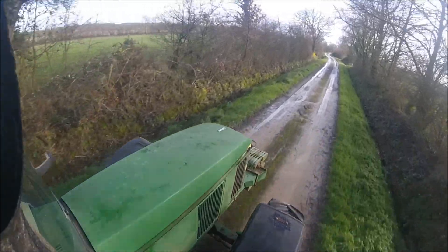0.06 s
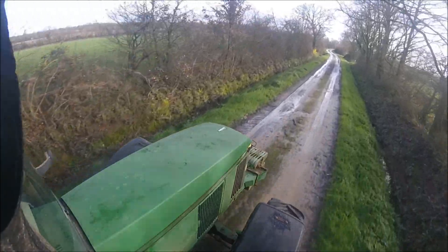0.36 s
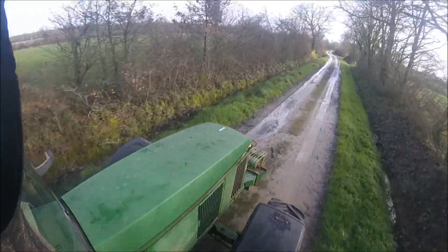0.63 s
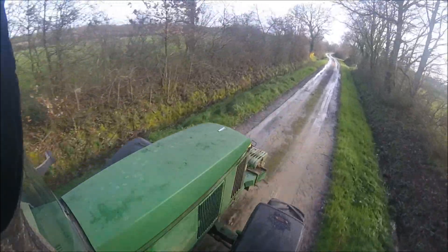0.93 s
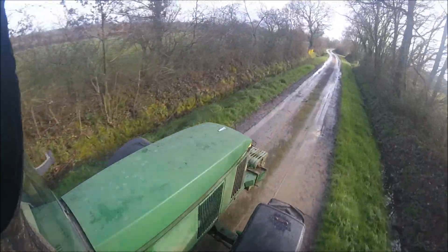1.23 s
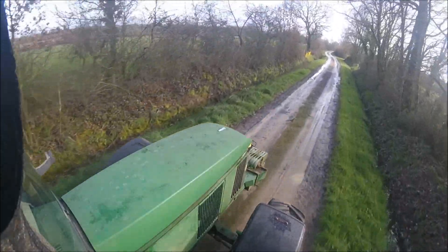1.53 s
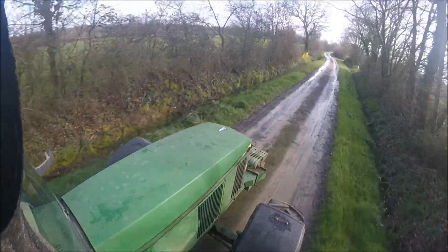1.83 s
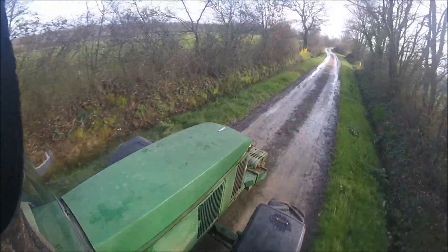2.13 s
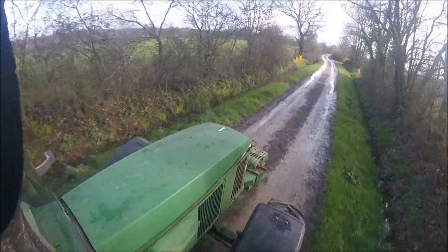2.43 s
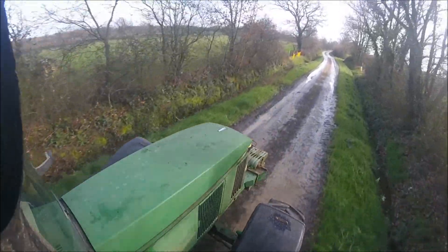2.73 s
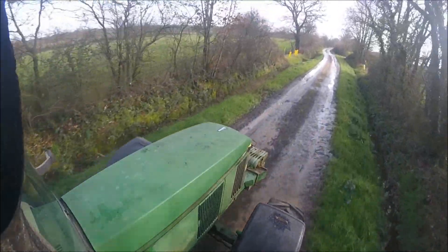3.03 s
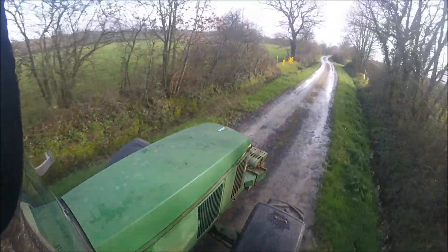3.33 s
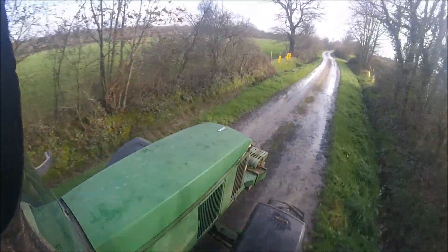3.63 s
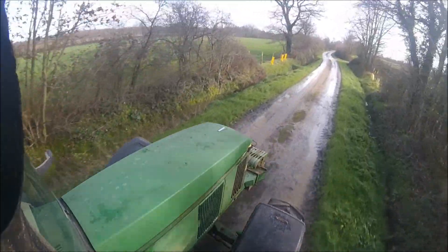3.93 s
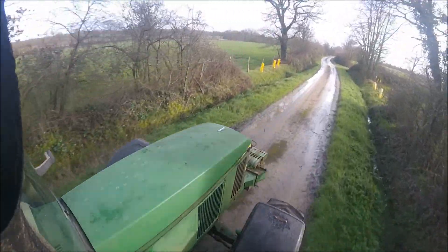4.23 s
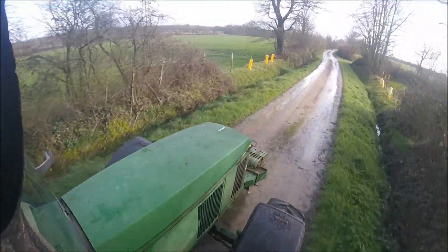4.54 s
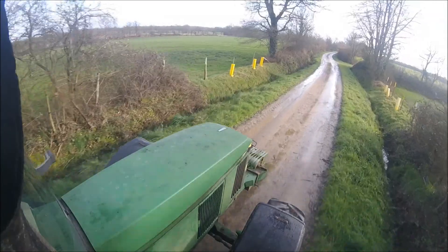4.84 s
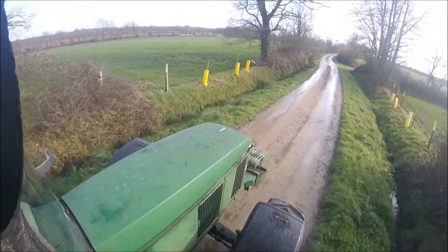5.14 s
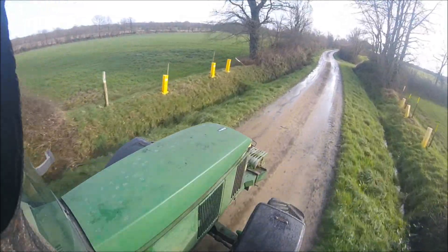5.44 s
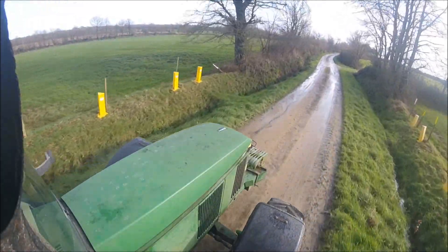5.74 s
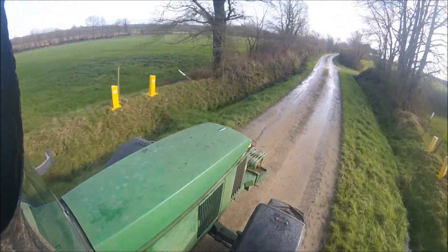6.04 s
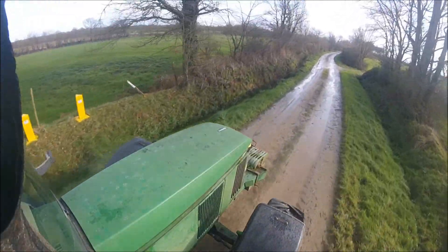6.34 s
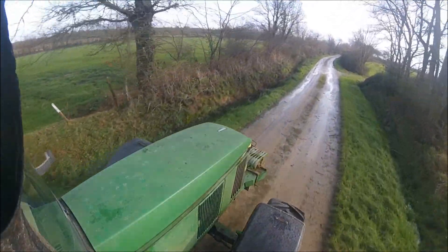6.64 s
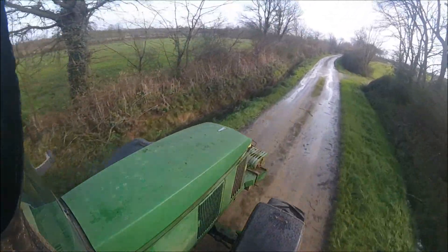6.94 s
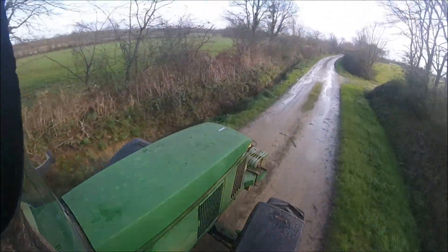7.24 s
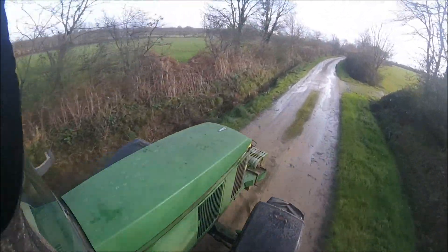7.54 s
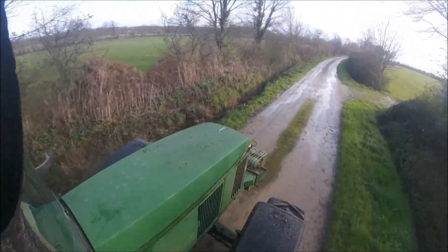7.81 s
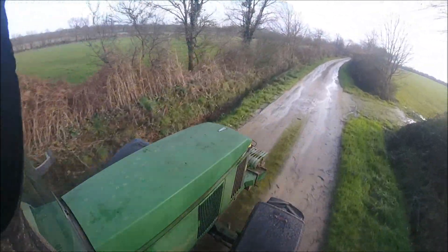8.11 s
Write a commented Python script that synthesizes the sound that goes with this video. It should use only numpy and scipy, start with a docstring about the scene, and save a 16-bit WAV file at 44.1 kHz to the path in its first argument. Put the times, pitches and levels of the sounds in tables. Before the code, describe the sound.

Inside a tractor cab, a mounted microphone picks up the deep drone and hard knock of the diesel engine, wavering slightly and creeping up in pitch over rumbling tyres and buzzing panels. Grit ticks and loose fittings knock now and then. Past halfway the farm track turns rough, with rattles, hollow roof thumps and a sharp jolt that muffles the level for a second. Further knocks and thumps follow.

```python
"""Inside the cab of a six-cylinder diesel tractor, microphone on a mounted camera, engine close by.
From the start each firing booms in the cab, shakes its panels and clatters in the block, while grit
ticks and loose fittings knock. The tractor slowly gathers speed along a farm track, the engine hunting
most around 3 s. A metal part chinks; from 5 s rough ground sets the fittings rattling and the roof
drumming. Near 6 s a pothole jolts the camera so hard that its limiter ducks everything for about
a second. More bumps follow near 8 s."""
import sys
import numpy as np
from scipy import signal
from scipy.fft import rfft, irfft
from scipy.io import wavfile
from scipy.ndimage import uniform_filter1d, minimum_filter1d

SR = 44100
rng = np.random.default_rng(int(sys.argv[2]) if len(sys.argv) > 2 else 0)


def unload_audio(sound):
    """Save the sound as a 16-bit wav file, at the path given as the first command line argument."""
    columns = np.transpose(np.atleast_2d(sound))
    # keep every value between -1 and 1, then stretch to whole-number steps
    steps = np.round(np.clip(columns, -1, 1) * 32767)
    wavfile.write(sys.argv[1], SR, steps.astype(np.int16))


N = 364707
TIME = np.arange(N) / SR

# The cylinders in firing order. Each row: combustion knock in dB, injector tick in dB, both relative.
CYLINDER_DB = [(5, 2.5), (5, 3.5), (2.5, 2), (5.5, 2.5), (5.5, 0.5), (2.5, 3)]
# Resonance of the cab roof. Each row: frequency in Hz, relative level in dB.
ROOF_SPECTRUM = [(60, -26.5), (130, -4), (200, 1.5), (310, 1), (400, -4), (600, -13.5), (1200, -44),
                 (4000, -78), (13000, -115)]


def amp(db):
    """Decibels to gain."""
    return 10 ** (np.asarray(db) / 20)


def unit(x):
    """Scales to rms 1."""
    return x / np.sqrt(np.mean(x ** 2) + 1e-20)


def curve(at, rows):
    """Reads between the rows of a two-column table along straight lines."""
    return np.interp(at, *np.transpose(rows))


def wander(rate_hz):
    """Slow random drift of rms 1."""
    hz = np.fft.rfftfreq(N, 1 / SR)
    return unit(irfft(rfft(rng.standard_normal(N)) / (1 + (hz / rate_hz) ** 4), N))


def colour(x, spectrum, size=4096):
    """Rings x through a causal body with the given spectrum; a unit click comes out with peak 1."""
    hz, db = np.transpose(spectrum)
    bin_hz = abs(np.fft.fftfreq(size, 1 / SR)) + 1
    log_gain = np.log(amp(np.interp(np.log(bin_hz), np.log(hz), db)))
    minimum_phase = np.exp(np.conj(signal.hilbert(log_gain)))
    ring = np.fft.ifft(minimum_phase).real[:size // 2]
    return signal.oaconvolve(x, ring / abs(ring).max())[:N]


def burst(firings, at, width):
    """A bump once a firing; its centre and width are shares of that cycle."""
    return np.exp(-(np.sin(np.pi * (firings - at)) / (np.pi * width)) ** 2)


def strength(firings, scatter_db, pattern_db=(0,)):
    """Gain of each firing: its cylinder's share and some chance."""
    index = np.floor(firings + .6).astype(int)
    chance = rng.standard_normal(index.max() + 1)
    return amp(np.take(pattern_db, index, mode="wrap") + scatter_db * chance[index])


def roughness(edge_s=0.041):
    """How rough the track is as the wheels run on to and off each stretch, 0 where it is smooth."""
    # Each row: start in seconds, end in seconds, roughness from 0 to 1.
    stretches = [(0.206, 0.852, 0.1), (5.034, 5.25, 0.5), (5.257, 5.604, 0.6), (5.596, 5.69, .95),
                 (5.715, 6.188, 0.8), (6.714, 6.996, 0), (7.743, 8.396, 0.6)]
    return sum(rough * (np.tanh((TIME - start) / edge_s) - np.tanh((TIME - end) / edge_s)) / 2
               for start, end, rough in stretches)


def rolling(shake_db, faster_hz, level_db=-22, lumps_db=2.0):
    """Lugged tyres rumble on the track, more where it is rough and as the tractor speeds up."""
    # Tyre rumble. Each row: frequency in Hz, relative level in dB.
    spectrum = [(10, -18.5), (28, -6), (55, 0.5), (130, 3), (220, -1), (400, -8), (900, -18), (2500, -31.5),
                (8000, -65.5), (13000, -110)]
    swell = amp(shake_db - shake_db.mean() + 0.23 * faster_hz + lumps_db * wander(17))
    return amp(level_db) * unit(colour(rng.standard_normal(N), spectrum) * swell)


def grit(gain_db=-8.5, stray_per_s=4, skitter_s=0.0021, touches=3):
    """Grit flung by the tyres skitters against the cab: a few sharp hits among many faint ones."""
    # The sharpest hits. Each row: time in seconds, relative level in dB.
    hits = [(.828, -23), (1.181, -44), (1.351, -26), (1.56, -33), (3.387, -28), (3.803, -29), (4.18, -28),
            (4.488, -26), (6.736, -31.5), (7.98, -27), (8.201, -30)]
    # Their bright tick. Each row: frequency in Hz, relative level in dB.
    spectrum = [(500, -28.5), (2500, -13.5), (5000, 1.5), (7500, 2.5), (9000, -9.5), (11000, -28),
                (14000, -59.5)]
    stray_times = TIME[rng.random(N) < stray_per_s / SR]
    strays = [(s, -32 + 6 * rng.standard_normal()) for s in stray_times]
    clicks = np.zeros(N + SR)
    for s, db in hits + strays:
        touch_s = s + skitter_s * (rng.random(touches) - .5)
        clicks[(touch_s * SR).astype(int)] += amp(db) * rng.choice([-1, 1], touches)
    return amp(gain_db) * colour(clicks, spectrum)


def chinks(attack_s=0.00055):
    """A loose metal part is shaken against its seat and rings for a moment."""
    # Each row: time in seconds, peak in dB.
    strikes = [(4.3817, -27), (4.5204, -27), (4.5772, -27.5), (4.6471, -31)]
    # The part's modes. Each row: frequency in Hz, relative level in dB, seconds to fall 60 dB.
    modes = [(2900, 0, .02), (3410, -5, 0.031), (3680, 4, 0.021)]
    t = np.arange(0, .1, 1 / SR)
    ring = sum(amp(db - 60 * t / t60) * np.sin(2 * np.pi * hz * t) for hz, db, t60 in modes)
    ring *= 1 - np.exp(-(t / attack_s) ** 2)
    clicks = np.zeros(N)
    for s, db in strikes:
        clicks[int(s * SR)] = amp(db)
    return signal.oaconvolve(clicks, ring / abs(ring).max())[:N]


def roof_drumming(firings, shake_db, level_db=-28, growth=2.6):
    """On rough ground the roof starts to drum, growing faster than the shaking that drives it."""
    drive = rng.standard_normal(N) * (0.69 + burst(firings, at=0, width=0.13))
    swell = amp(growth * (shake_db - shake_db.mean()))
    return amp(level_db) * unit(colour(drive * swell, ROOF_SPECTRUM))


def roof_thumps():
    """The hardest bumps each give the roof overhead one hollow thump."""
    # Each row: time in seconds, peak in dB.
    bumps = [(5.248, -11), (5.456, -6), (5.623, -10), (5.647, -3), (5.665, -6), (5.69, -7), (8.04, -12),
             (8.06, -4.5)]
    blows = np.zeros(N)
    for s, db in bumps:
        blows[int(s * SR)] = -amp(db)
    return colour(blows, ROOF_SPECTRUM)


def rattles(rough, min_bounce_s=.0007, bounce=0.14, rough_per_s=20):
    """A cab fitting clacks, rings hollow and springs back; rough ground adds small knocks by chance."""
    # The loudest knocks. Each row: time in seconds, hollow peak in dB, clack in dB against that peak.
    loud_knocks = [(.597, -12, -8), (2.925, -14, -5), (3.114, -15.5, -3), (5.052, -11.5, -5),
                   (5.111, -13, -16), (5.153, -10, -16), (5.232, -18, -6), (5.247, -11, -2),
                   (5.293, -7, -6), (5.302, -10, -6), (5.312, -9, -9), (5.345, -10, -3), (5.387, -6, -16),
                   (5.578, -8, -10), (6.817, -8, -8), (6.985, -12.5, -3), (7.945, -18, -4),
                   (7.998, -6.5, -7), (8.247, -11, -11)]
    # The hollow ring and the hard clack. Each row: frequency in Hz, relative level in dB.
    hollow_spectrum = [(80, -11), (250, 2), (500, 12.5), (1000, -5), (1700, -9), (3000, -29.5), (4200, -27),
                       (5200, -21.5), (8000, -48), (11000, -75), (14000, -88.5)]
    clack_spectrum = [(300, -17.5), (650, -2.5), (950, -1.5), (1350, -13.5), (1900, -11.5), (3000, -22),
                      (5000, -30), (8000, -48.5), (10500, -78.5), (13000, -98)]
    small_times = TIME[rng.random(N) < rough_per_s * rough / SR]
    knocks = loud_knocks + [(s, -19 + 5 * rng.standard_normal(), -6) for s in small_times]
    hollow, clack = np.zeros((2, N + SR))
    for s, db, clack_db in knocks:
        bounce_at = s + min_bounce_s * (1 + rng.random())
        hollow[int(s * SR)] -= amp(db)
        hollow[int(bounce_at * SR)] += bounce * amp(db)
        clack[int(s * SR)] -= amp(db + clack_db)
    return colour(hollow, hollow_spectrum) + colour(clack, clack_spectrum)


def pothole(rise_s=.0004, lag_s=0.00074, sway_s=.008, crack_s=.00004, dull_hz=5500):
    """The camera mount snaps inward with a thin crack, pushes back dully and sways as it settles."""
    # Bangs right at the microphone. Each row: time in seconds, peak in dB before dulling,
    # snap width in seconds, relative weight of the rebound, decay of its push in seconds.
    bangs = [(5.8554, 8, .00027, 2.1, 0.0014), (5.9113, 6.5, 0.00027, 0.34, 0.0016),
             (5.9976, 5.5, 0.00031, 0.37, 0.0028), (6.0634, 0, .0003, 4, 0.0015),
             (6.1057, -3.5, .00028, 2.7, 0.00045)]
    out = np.zeros(N)
    for s, db, snap_s, rebound, push_s in bangs:
        t = TIME - s
        snap = np.exp(-((t - lag_s / 2) / snap_s) ** 2)
        crack = 0.16 * np.exp(-((t - lag_s / 2) / crack_s) ** 2)
        after = np.maximum(t - lag_s, 0)
        push = (1 - np.exp(-after / rise_s)) * np.exp(-after / push_s)
        sway = .075 * after / sway_s * np.exp(1 - after / sway_s)
        bang = 2 * rebound * (push - sway) - snap - crack
        out += amp(db) * bang / abs(bang).max()
    return signal.sosfilt(signal.butter(2, dull_hz, fs=SR, output="sos"), out)


def injectors(ignitions, level_db, ring_hz=5850):
    """Each injector ticks as its needle shuts, just after the knock, and rings briefly."""
    # The needle's tick. Each row: frequency in Hz, relative level in dB.
    spectrum = [(3000, -42.5), (5000, -15.5), (5600, 1), (6000, -3.5), (6600, -0.5), (7600, -8.5),
                (8700, -21.5), (10500, -31), (13000, -68)]
    tick = rng.standard_normal(N) * (0.56 + burst(ignitions, at=-0.08, width=0.14))
    ring = signal.lfilter(*signal.iirpeak(ring_hz, 10, fs=SR), rng.standard_normal(N))
    drive = tick + 1.7 * ring * burst(ignitions, at=.12, width=.15)
    drive *= strength(ignitions, scatter_db=1.7, pattern_db=np.transpose(CYLINDER_DB)[1])
    return amp(level_db) * unit(colour(drive, spectrum))


def diesel_knock(ignitions, level_db):
    """Combustion gives a crisp rap at each ignition, ahead of its exhaust pulse."""
    # The rap. Each row: frequency in Hz, relative level in dB.
    spectrum = [(800, -30.5), (1500, -21.5), (2000, -5.5), (2400, 0), (3000, -1.5), (3500, -1.3),
                (4100, -11), (4400, -13.5), (4950, -6.5), (5500, -11.5), (6200, -23.5), (8000, -41.5),
                (13000, -85.5)]
    gate = 0.41 + burst(ignitions, at=-0.21, width=0.14)
    gate *= strength(ignitions, scatter_db=0.9, pattern_db=np.transpose(CYLINDER_DB)[0])
    return amp(level_db) * unit(colour(rng.standard_normal(N) * gate, spectrum))


def engine_block(firings, level_db):
    """The engine block rings on from one firing to the next, swelling with each pulse."""
    # Resonance of the block. Each row: frequency in Hz, relative level in dB.
    spectrum = [(400, -19.5), (950, 9.5), (1400, 0.5), (1850, -3), (2300, -5), (3000, -15), (5000, -26.5),
                (10500, -65), (13000, -87.5)]
    drive = rng.standard_normal(N) * (0.66 + burst(firings, at=0.03, width=0.047))
    return amp(level_db) * unit(colour(drive, spectrum))


def panels(firings, level_db, taps_per_s=2400):
    """Cab panels buzz against their frames at each pulse: taps of uneven size in a dull rush."""
    # Resonance of the panels. Each row: frequency in Hz, relative level in dB.
    spectrum = [(60, -36.5), (130, -7.5), (230, -3.5), (340, 1.5), (480, -1), (700, -6), (1000, -8.5),
                (1300, -12.5), (1800, -27.5), (3000, -36), (5000, -44), (9000, -55), (13000, -100)]
    taps = rng.standard_normal(N) * (rng.random(N) < taps_per_s / SR)
    contact = 0.47 * unit(taps) + 0.73 * rng.standard_normal(N)
    drive = contact * (0.52 + burst(firings, at=0, width=0.087)) * strength(firings, scatter_db=-0.3)
    return amp(level_db) * unit(colour(drive, spectrum))


def exhaust_boom(firings, firing_hz, rough, lead_rad=0.61):
    """Exhaust pulses boom in the cab: nine wavering harmonics slide through its resonances."""
    # The boom of harmonics 1 to 3. Each row: frequency in Hz, level in dB on smooth ground.
    cab_boom = [(80, -10), (89, -11), (96, -14), (160, -26.5), (166, -24), (172, -20.5), (179, -20.5),
                (185, -24.5), (190, -21.5), (240, -35.5), (250, -47), (263, -28), (272, -25.5),
                (285, -24.5)]
    # Rough ground moves it into the overtones: change in dB of harmonics 1, 2 and 3 at full roughness.
    rough_shift_db = [-4.5, 6.5, 3]
    # How the cab passes harmonics 4 to 9. Each row: frequency in Hz, level in dB against base_db.
    cab_upper = [(315, -21), (335, -22), (350, -18.5), (380, -18.5), (415, -26), (435, -22.5), (450, -31.5),
                 (500, -29), (530, -31), (570, -27), (610, -31.5), (660, -35.5), (860, -37.5)]
    low_db = [curve(k * firing_hz, cab_boom) + rough * db for k, db in enumerate(rough_shift_db, 1)]
    base_db = curve(firing_hz, cab_boom) + 3 * rough
    upper_db = [base_db + curve(k * firing_hz, cab_upper) + 1.5 * wander(2.3) for k in range(4, 10)]
    tone = amp(low_db[0] + 0.48 * wander(25)) * np.cos(2 * np.pi * firings)
    for k, db in enumerate(low_db[1:] + upper_db, 2):
        tone += amp(db + 0.73 * wander(5.7)) * np.cos(2 * np.pi * k * firings + lead_rad)
    return -np.sqrt(2) * tone


def engine_speed(hunt_hz=1.45, period_s=.836, peak_s=3.35, fade_s=3.0):
    """Firings per second: the speed hunts around the throttle setting in a swing that builds and dies."""
    # Each row: time in seconds, firings per second.
    throttle = [(0, 79.72), (1.9, 84.2), (4.6, 88.39), (7, 93.72), (8.27, 95.3)]
    t = TIME - peak_s
    hunting = hunt_hz * np.exp(-(t / fade_s) ** 2) * np.cos(2 * np.pi * t / period_s)
    return curve(TIME, throttle) + hunting


def scene(cruise_hz=87, advance_per_hz=.013):
    """The crankshaft times every engine sound; speed, load and rough ground shake the cab."""
    # Load on the engine. Each row: time in seconds, gain of knock and block in dB.
    load = [(0, 2), (1.2, 1.3), (2.2, 0.05), (5, 1.8), (6.5, 0.3), (7.4, 1), (8, 2), (8.27, 3)]
    load_db = curve(TIME, load)
    firing_hz, rough = engine_speed(), roughness()
    faster_hz = firing_hz - cruise_hz
    firings = np.cumsum(firing_hz) / SR
    ignitions = firings + advance_per_hz * faster_hz  # injection comes earlier with speed
    shake_db = -27.5 - 0.1 * faster_hz + 2 * rough
    engine = exhaust_boom(firings, firing_hz, rough)
    engine += engine_block(firings, level_db=-36.5 + load_db)
    engine += diesel_knock(ignitions, level_db=-39.5 + load_db)
    engine += injectors(ignitions, level_db=-53 + 0.06 * faster_hz)
    cab = panels(firings, level_db=shake_db + 0.33 * load_db)
    cab += roof_drumming(firings, shake_db + 0.48 * faster_hz)
    track = rolling(shake_db, faster_hz) + pothole() + rattles(rough) + roof_thumps() + chinks() + grit()
    return (engine + cab + track)[None]


def record(dry, ceiling_db=-.5, ahead_s=0.063, recover_s=0.6, edge_hz=15700):
    """The camera's limiter ducks ahead of a loud peak and recovers slowly; overshoots are rounded off."""
    peak_db = 20 * np.log10(abs(uniform_filter1d(dry[0], size=48)) + 1e-9)
    held_db = -minimum_filter1d(-peak_db, size=int(ahead_s * SR))
    over_db = np.maximum(held_db - ceiling_db, 0)
    early_db = np.interp(TIME + ahead_s / 2, TIME, over_db)
    fade = np.exp(-TIME / recover_s)
    duck_db = np.maximum.accumulate(early_db / fade) * fade  # each peak's cut dies away exponentially
    ducked = dry * amp(-uniform_filter1d(duck_db, size=400))
    rounded = ducked / (1 + (ducked / .95) ** 10) ** (1 / 10)
    low_pass = signal.firwin(255, edge_hz, window=("kaiser", 8), fs=SR)
    return signal.oaconvolve(rounded, low_pass[None], "same")


dry = scene()
out = record(dry)
unload_audio(out)
```